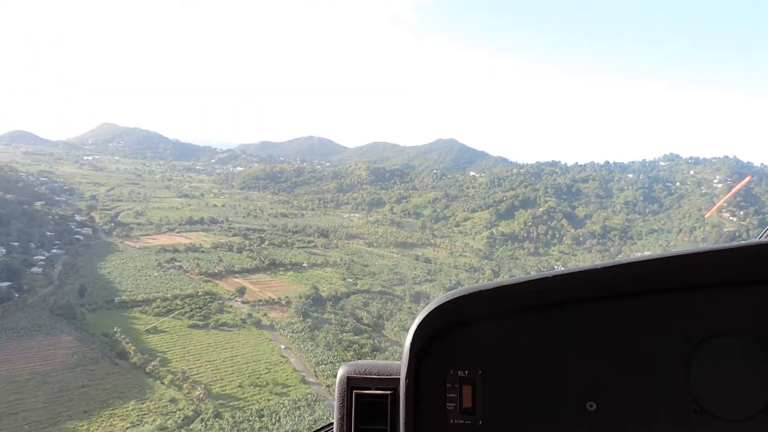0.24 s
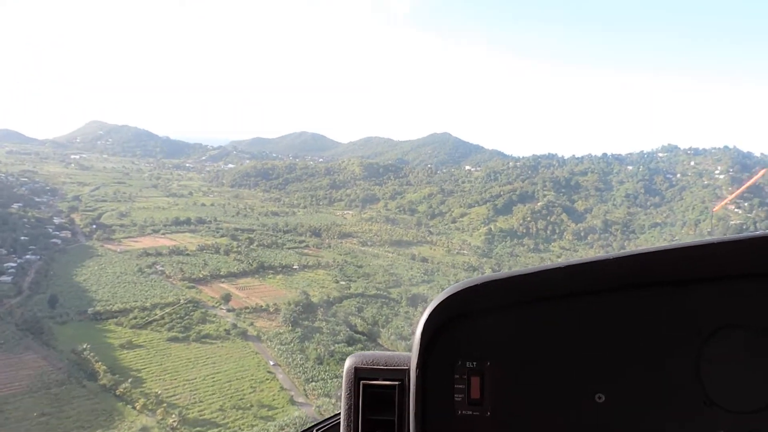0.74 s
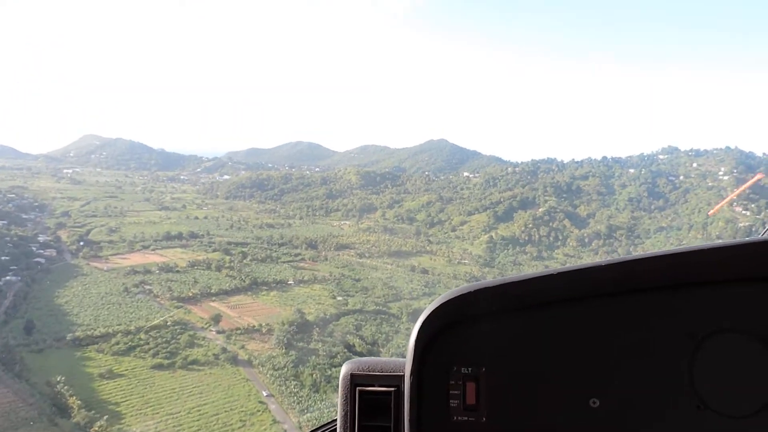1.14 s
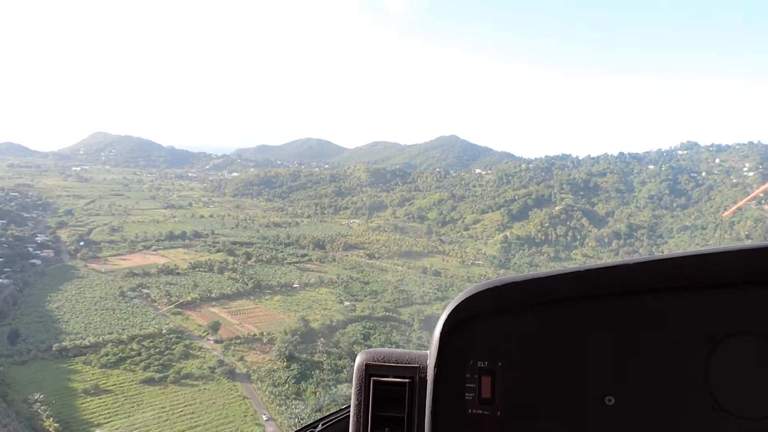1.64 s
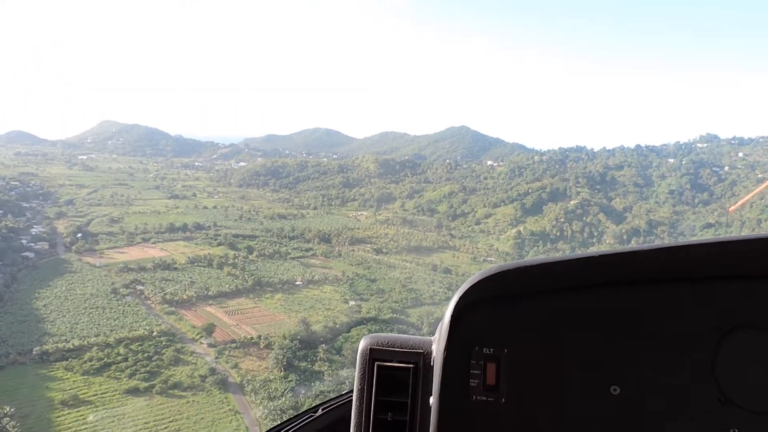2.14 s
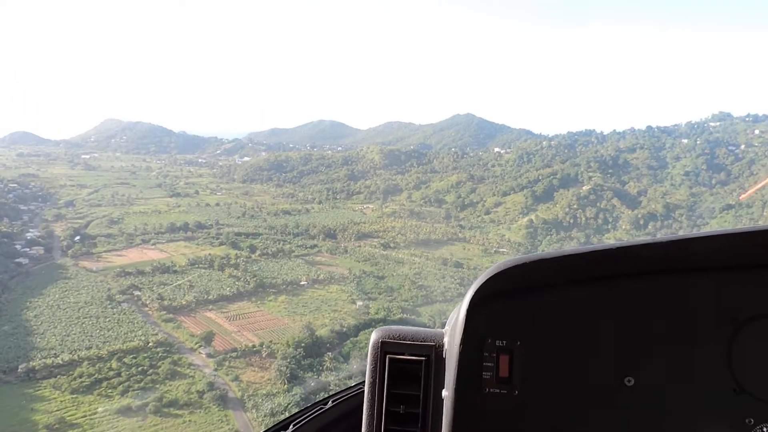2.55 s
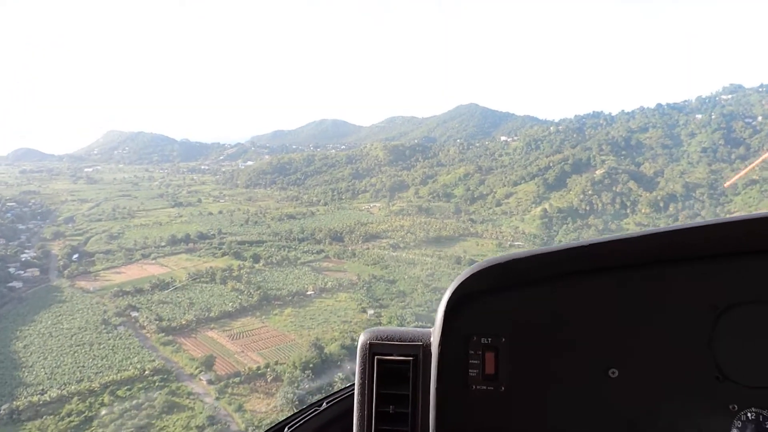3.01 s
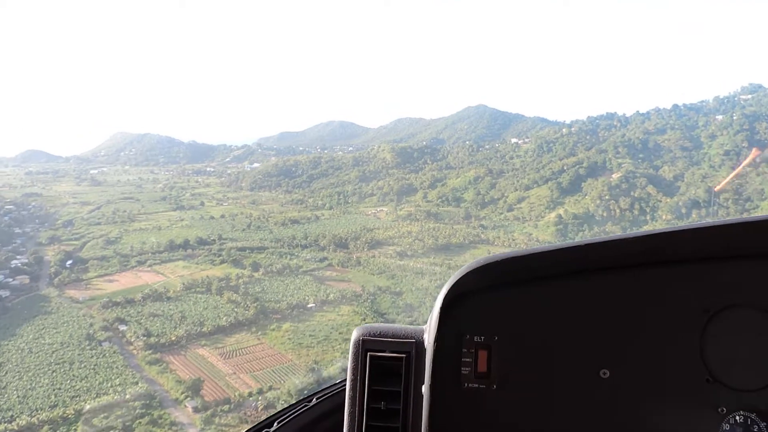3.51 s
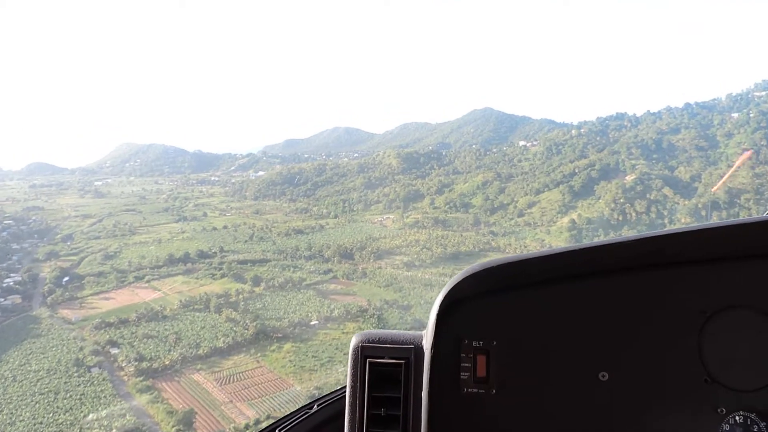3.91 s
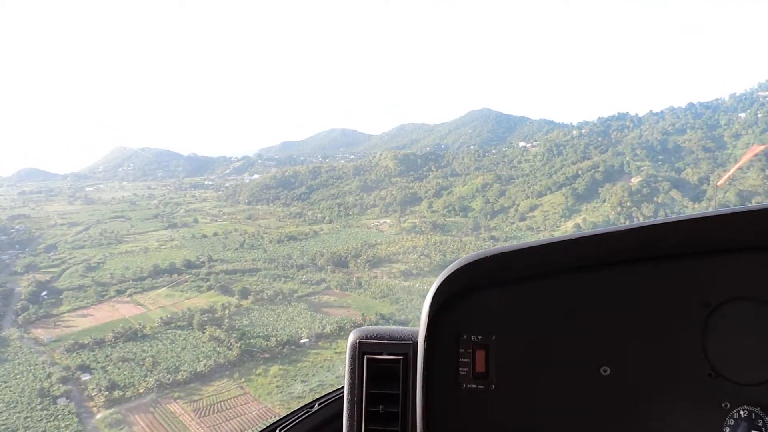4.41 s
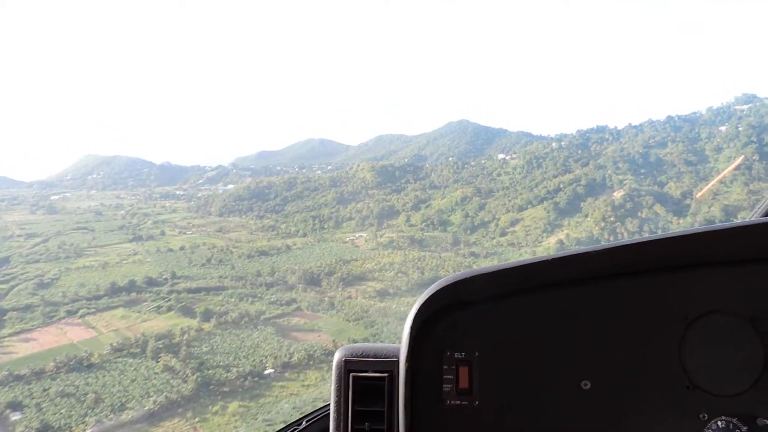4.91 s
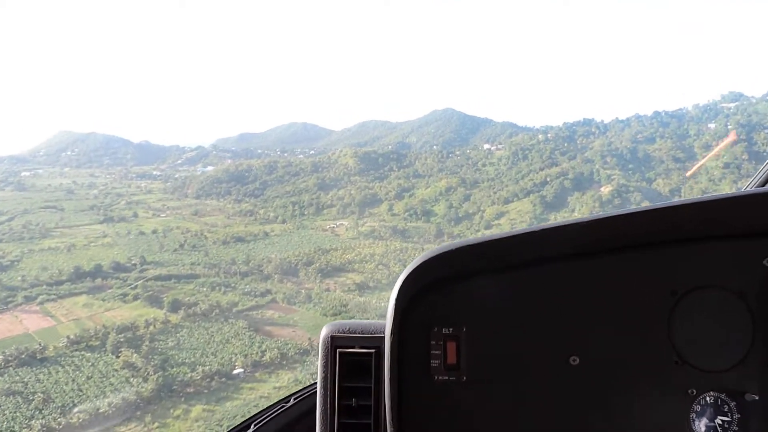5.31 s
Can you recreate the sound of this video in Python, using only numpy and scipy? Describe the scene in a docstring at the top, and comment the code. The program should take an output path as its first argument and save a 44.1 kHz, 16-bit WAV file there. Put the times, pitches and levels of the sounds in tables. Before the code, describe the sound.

Heard from inside a small helicopter cruising over green hills: a continuous low roar pulses about twenty times a second with the rotor blades. A tail rotor drone and shaft hum sit beneath broad air rush over the canopy, while steady gear whines ride on top. A soft breathy door-gap whistle swells briefly near the middle. The microphone is close, within the cabin, with bass nearly centred and airy highs wide.

```python
"""Inside the cabin of a light turbine helicopter in level flight.
The main rotor beats, the tail rotor drones and the gears whine: harmonic series locked to one rotor clock.
Turbulent air, as filtered noise, rumbles, booms in the cabin and rushes over the canopy;
each blade modulates the boom, rush and hiss. The compressor whistles faintly and a door gap breathes softly."""
import sys
import numpy as np
from scipy.fft import rfft, irfft
from scipy.io import wavfile
from scipy.ndimage import uniform_filter1d

SR = 44100
rng = np.random.default_rng(int(sys.argv[2]) if len(sys.argv) > 2 else 0)


def int16_out(signal):
    """Quantize to a 16-bit WAV file."""
    q = np.round(np.clip(np.atleast_2d(signal).T, -1, 1) * 32767)
    wavfile.write(sys.argv[1], SR, q.astype(np.int16))


N = 245195
TIME = np.arange(N) / SR  # seconds
FREQS = np.maximum(np.arange(N // 2 + 1) * SR / N, 1)  # Hz, kept above zero for the logarithm
LEFT_RIGHT = np.array([[1], [-1]])
BLADE_HZ = 19.7  # passing rate of the main rotor blades


def from_db(db):
    """Logarithmic level: decibels to amplitude gain."""
    return 10 ** (np.asarray(db) / 20)


def rms_one(x):
    """Normalisation: scale to unit rms."""
    return x / np.sqrt(np.mean(x ** 2) + 1e-20)


def in_time(rows):
    """Linear interpolation: a level curve read at every sample."""
    seconds, level_db = np.transpose(rows)
    return np.interp(TIME, seconds, level_db)


def over_hz(points):
    """Logarithmic pitch axis: a spectral table read at every frequency."""
    hz, value = np.transpose(points)
    return np.interp(np.log(FREQS), np.log(hz), value)


def bell(hz, width_hz):
    """Resonance: a Lorentzian curve with a peak of 1."""
    return 1 / (1 + (2 * (FREQS - hz) / width_hz) ** 2)


def drift(rate_hz):
    """Random fluctuation: low-passed noise of unit rms."""
    lowpass = 1 / (1 + (FREQS / rate_hz) ** 2) ** 2
    return rms_one(irfft(rfft(rng.standard_normal(N)) * lowpass, N))


def swells(rows):
    """Superposition of Gaussian swells in dB; each length is the width at half height."""
    return sum(db * 0.5 ** ((2 * (TIME - centre_s) / length_s) ** 2) for centre_s, length_s, db in rows)


def steadied(x, seconds):
    """Level compression: divide noise by its running rms."""
    power = uniform_filter1d(x.mean(axis=0) ** 2, int(seconds * SR))
    return x / np.sqrt(power)


def band_lifted(x, hz, width_hz, lift_db):
    """Time-varying resonance: raise one band by a changing amount."""
    return x + irfft(rfft(x) * bell(hz, width_hz), N) * (from_db(lift_db) - 1)


def buffeted(x, gusts, width_hz):
    """Superposed local resonances: every gust lifts or drops one band."""
    spectrum = rfft(x)
    out = x.copy()
    for centre_s, length_s, change_db, centre_hz in gusts:
        band = irfft(spectrum * bell(centre_hz, width_hz), N)
        out += band * (from_db(swells([(centre_s, length_s, change_db)])) - 1)
    return out


def partials(clock, hz, table, scatter, scatter_rate_hz):
    """Harmonic series of a rotating part; multipath scatter makes each partial waver."""
    out = np.zeros((2, N))
    for multiple, level_db, pan_db, lead_rad in table:
        phase = 2 * np.pi * (multiple * hz * clock + rng.random()) + LEFT_RIGHT * lead_rad / 2
        in_phase = (1 + scatter * drift(scatter_rate_hz)) * np.cos(phase)
        quadrature = scatter * drift(scatter_rate_hz) * np.sin(phase)
        out += from_db(level_db + LEFT_RIGHT * pan_db / 2) * rms_one(in_phase + quadrature)
    return out


# stereo width of the air noise: frequency_hz, side_minus_mid_db
FIELD_WIDTH = [(40, -29), (130, -32), (250, -15), (340, -20), (480, -9.5), (660, -15), (1000, -8),
               (1230, -4), (1500, -8), (1820, 1), (2100, -3.5), (2700, 3), (3500, 3), (5500, -1.5)]
# stereo balance of the air noise: frequency_hz, left_minus_right_db
FIELD_BALANCE = [(60, 0), (360, 1.5), (660, 1.5), (1200, 1.5), (2400, -1), (4000, 1.2), (7200, 2),
                 (13000, 4)]
# quarter-turn phase share between mid and side, by frequency; positive where the left channel leads:
# frequency_hz, share (-1 to 1)
FIELD_LEAD = [(130, .2), (260, -.2), (700, -.1), (1120, .35), (1720, -.2), (2000, .35), (2450, -.25),
              (3000, -.25), (4800, -.05), (6500, .12), (9000, 0)]


def air_noise(gain):
    """Spatial coherence: coloured noise whose two channels agree by frequency; mid rms 1."""
    mid, side = rfft(rng.standard_normal((2, N)))
    width = from_db(over_hz(FIELD_WIDTH))
    lead = np.clip(over_hz(FIELD_LEAD), -1, 1)
    # a quarter-turn of phase between mid and side makes one channel lead
    side = np.sqrt(1 - lead ** 2) * side + 1j * lead * mid
    field = (mid + LEFT_RIGHT * width * side) / np.sqrt(1 + width ** 2)
    balance = from_db(LEFT_RIGHT * over_hz(FIELD_BALANCE) / 2)
    out = irfft(field * gain * balance, N)
    return out / np.std(out.mean(axis=0))


# airflow shared by boom, rush and hiss; it peaks early, then eases off: time_s, level_db
AIRFLOW_LEVEL = [(0, 0.3), (1.0, 0.5), (2.8, 0.05), (5.56, -0.95)]


def airflow_db():
    """Flow noise grows with airflow: the slow level common to boom, rush and hiss."""
    return in_time(AIRFLOW_LEVEL)


# swish of each passing blade, before each layer scales it: multiple of the blade rate, depth (0 to 1)
SWISH_HARMONICS = [(1, .05), (2, .025), (3, .015)]


def swish(clock):
    """Amplitude modulation: swing of the air noise around its mean as the blades pass."""
    turn = 2 * np.pi * BLADE_HZ * clock
    return sum(depth * np.cos(multiple * turn) for multiple, depth in SWISH_HARMONICS)


# relative spectrum of the deep hull rumble: frequency_hz, density_db (per Hz)
RUMBLE_SPECTRUM = [(10, -30), (24, -32), (34, 3), (55, 1), (72, 3.5), (100, -8.5), (200, -46), (1000, -100)]


def hull_rumble():
    """Turbulent boundary-layer excitation: deep noise from the hull."""
    return from_db(-31.5) * steadied(air_noise(from_db(over_hz(RUMBLE_SPECTRUM))), seconds=0.25)


# resonances of the door gap: frequency_hz, width_hz, level_db (relative)
DOOR_GAP_MODES = [(2660, 380, -4), (2940, 160, -2)]
# swells of the door whistle: centre_s, length_s, rise_db
DOOR_GAP_SWELLS = [(2.42, 0.3, 4), (2.66, 0.24, 9.5), (2.99, 0.24, 7.5)]
DOOR_GAP_DB = -57  # between swells


def door_leak():
    """Resonant filtering: air noise through a narrow gap makes a soft, breathy, swelling whistle."""
    colour = sum(from_db(db) * bell(hz, width_hz) for hz, width_hz, db in DOOR_GAP_MODES)
    return from_db(DOOR_GAP_DB + swells(DOOR_GAP_SWELLS)) * air_noise(colour)


# relative spectra of canopy rush and seal hiss: frequency_hz, density_db (per Hz)
RUSH_SPECTRUM = [(20, -38), (150, -19), (240, -1), (340, -1), (420, -1.5), (480, -5.5), (610, -4),
                 (1050, -9.5), (1200, -10), (1800, -11), (2150, -15), (2700, -16.5), (3250, -21),
                 (3900, -26.5), (9000, -70)]
HISS_SPECTRUM = [(1000, -40), (2500, -17), (4400, 3.5), (4950, 0.5), (5600, 1), (7000, -4.5), (8800, -7),
                 (10200, -7), (11800, -7.5), (13400, -8)]
# cabin and panel resonances: frequency_hz, width_hz, gain_db
PANEL_MODES = [(241, 16, 3.5), (320, 15, 4), (380, 15, 1), (443, 13, 0.5), (580, 17, 1.5), (747, 75, 1.5),
               (928, 42, 2.5), (1056, 89, 3), (1947, 63, 2.5), (2150, 58, 2.5), (2460, 160, 2.5),
               (3300, 23, 2.5), (3460, 120, 2.5), (4100, 90, 3)]
# slow hollowing and filling of the rush's low middle: centre_s, length_s, change_db, centre_hz
RUSH_BAND_SWELLS = [(1.6, 1.0, -1.5, 378), (2.85, 0.91, 2.5, 427), (3.9, 0.7, 2, 320), (5.4, 0.45, 3, 313)]
RUSH_DB, HISS_DB = -29, -51.5  # before the airflow changes
CHOP_HZ, CHOP_WIDTH_HZ = 480, 700  # band that the blades chop hardest
CHOP_DB, CHOP_UNEVEN_DB = 0.55, 0.5  # swing with the blades, random swing
ROAR_HZ, ROAR_WIDTH_HZ, ROAR_FOLLOWS = 2300, 990, 0.8  # faster air brightens this band: dB per dB
HISS_SWISH = 0.82  # share of the blade swish


def canopy_air(clock):
    """Modulated flow noise: rush over the canopy and seal hiss swell with each blade's downwash."""
    blade = swish(clock)
    speed_db = airflow_db()
    flow_db = speed_db + 0.4 * drift(32)
    modes_db = sum(db * bell(hz, width_hz) for hz, width_hz, db in PANEL_MODES)
    rush = steadied(air_noise(from_db(over_hz(RUSH_SPECTRUM) + modes_db)), seconds=0.24)
    rush = buffeted(rush, RUSH_BAND_SWELLS, width_hz=67)
    chop_db = CHOP_DB * np.cos(2 * np.pi * BLADE_HZ * clock) + CHOP_UNEVEN_DB * drift(29)
    rush = band_lifted(rush, CHOP_HZ, CHOP_WIDTH_HZ, chop_db)
    rush = band_lifted(rush, ROAR_HZ, ROAR_WIDTH_HZ, ROAR_FOLLOWS * speed_db)
    rush = from_db(RUSH_DB + flow_db) * rush
    hiss = from_db(HISS_DB + flow_db) * air_noise(from_db(over_hz(HISS_SPECTRUM)))
    return rush * (1 + blade) + hiss * (1 + HISS_SWISH * blade)


# compressor tone: multiple, level_db (before its level curve), left_minus_right_db, left_lead_rad
COMPRESSOR_TONE = [(1, -72, 3, 1)]
# coming and going of that tone: time_s, level_db (relative)
COMPRESSOR_LEVEL = [(0, -8), (2.3, -7), (2.6, 0), (3.4, 1.5), (3.8, -3), (4.6, 0.5), (5.15, 3), (5.56, -4)]
WHISTLE_HZ = 10831
SKIRT_HZ, SKIRT_WIDTH_HZ, SKIRT_DB = 10815, 390, -70  # hiss around the whistle


def compressor(clock):
    """Tone in narrow-band noise: a thin whistle comes and goes on fluttering turbulent hiss."""
    tone = partials(clock, WHISTLE_HZ, COMPRESSOR_TONE, scatter=0.7, scatter_rate_hz=30)
    whistle = from_db(in_time(COMPRESSOR_LEVEL)) * tone
    skirt = steadied(air_noise(bell(SKIRT_HZ, SKIRT_WIDTH_HZ)), seconds=0.12)
    return whistle + from_db(SKIRT_DB + 2.5 * drift(22)) * skirt


# gear partials: multiple, level_db (before any trim below), left_minus_right_db, left_lead_rad
MAIN_MESH = [(1, -43, -3, 0), (2, -45, -1.5, 1.4), (3, -52.5, 10.5, 2), (4, -55.5, 4, 4.5), (5, -63, 4, -1),
             (6, -71, -12, 1)]
BEVEL_MESH = [(1, -46, 1.7, -1.5)]
ENGINE_MESH = [(1, -52, -1.3, -1)]
MESH_HZ, BEVEL_HZ, ENGINE_GEAR_HZ = 656.52, 1750.6, 1735.0
MAIN_TRIM_DB, BEVEL_TRIM_DB = -0.06, 1.5


def gearbox(clock):
    """Gear meshing: tooth contacts whine at their mesh rates through the cabin roof."""
    main = partials(clock, MESH_HZ, MAIN_MESH, scatter=0.028, scatter_rate_hz=6.8)
    bevel = partials(clock, BEVEL_HZ, BEVEL_MESH, scatter=0.075, scatter_rate_hz=15)
    engine = partials(clock, ENGINE_GEAR_HZ, ENGINE_MESH, scatter=0.33, scatter_rate_hz=4.0)
    return from_db(MAIN_TRIM_DB) * main + from_db(BEVEL_TRIM_DB) * bevel + engine


# tail rotor and drive shaft partials: multiple, level_db, left_minus_right_db, left_lead_rad
TAIL_PARTIALS = [(1, -31, 2.8, 0.019), (2, -27, 1, 0.078), (3, -44.5, 6, -.2), (4, -53, 2.3, -.1)]
SHAFT_PARTIALS = [(1, -34, 2.1, .15)]
TAIL_HZ, SHAFT_HZ = 69.62, 102.3


def tail_drone(clock):
    """Rotational noise: tail rotor harmonics and the hum of the drive shaft."""
    tail = partials(clock, TAIL_HZ, TAIL_PARTIALS, scatter=0.083, scatter_rate_hz=3.7)
    shaft = partials(clock, SHAFT_HZ, SHAFT_PARTIALS, scatter=0.16, scatter_rate_hz=2.7)
    return tail + shaft


# relative spectrum of the cabin boom: frequency_hz, density_db (per Hz)
BOOM_SPECTRUM = [(20, -46), (65, -18), (82, -11), (94, -0.5), (118, 3), (150, -0.5), (198, -6), (222, -14),
                 (400, -54), (1000, -100)]
BOOM_DB = -25  # before the airflow changes
BOOM_SWISH, BOOM_LAG_S = 1.5, 0.015  # multiple of the blade swish, and its delay


def cabin_boom(clock):
    """Delayed amplitude modulation: a low roar pumps just after each blade."""
    boom = steadied(air_noise(from_db(over_hz(BOOM_SPECTRUM))), seconds=0.07)
    pumping = 1 + BOOM_SWISH * swish(clock - BOOM_LAG_S)
    return from_db(BOOM_DB + airflow_db()) * boom * pumping


# gusts and lulls in the low drone: centre_s, length_s, change_db, centre_hz
DRONE_GUSTS = [(0.04, 0.16, 4, 121), (0.144, 0.04, -6, 145), (0.493, 0.13, 5.5, 165), (0.78, 0.17, 5, 154),
               (1.26, 0.12, 1, 171), (1.46, 0.054, -7, 135), (1.565, 0.07, 6.5, 149), (1.70, 0.035, 9, 110),
               (2.11, 0.084, 6, 120), (2.233, 0.053, -9, 126), (2.327, 0.07, 8.5, 131),
               (2.60, 0.23, 2.5, 170), (2.877, 0.07, -5, 140), (3.48, 0.21, 3.2, 135),
               (3.69, 0.088, 0, 110), (3.985, 0.13, 1, 188), (4.175, 0.14, 2.5, 115),
               (4.367, 0.07, -7, 131), (4.517, 0.21, -4, 173), (4.897, 0.2, 5.5, 101),
               (5.035, 0.076, 5.5, 140), (5.49, 0.084, 3.5, 120)]


def low_drone(clock):
    """Band-wise gust modulation: tail drone and cabin boom swell or thin together."""
    return buffeted(tail_drone(clock) + cabin_boom(clock), DRONE_GUSTS, width_hz=43)


# harmonics of the blade pressure pulse: multiple of the blade rate, level_db (mean rms level)
PULSE_HARMONICS = [(2, -28), (3, -35), (4, -41)]
BEAT_UNEVEN_DB, HEAVE_DB = 0.6, -29.3


def blade_beats(clock):
    """Fourier synthesis: one rounded pressure pulse per blade, while the hull heaves the opposite way."""
    turn = 2 * np.pi * BLADE_HZ * clock
    pulse = sum(from_db(db) * np.cos(multiple * turn) for multiple, db in PULSE_HARMONICS)
    pulse = pulse * from_db(BEAT_UNEVEN_DB * drift(9.9))
    heave = from_db(HEAVE_DB) * np.cos(turn)
    return np.sqrt(2) * (pulse - heave)  # rms levels to peaks


FIRST_BLADE_S = 0.0198  # near this time the clock passes zero


def scene():
    """Phase locking: all rotating parts share one clock and its slight wander."""
    clock = np.cumsum(1 + 0.00055 * drift(0.97)) / SR - FIRST_BLADE_S
    air = hull_rumble() + door_leak() + canopy_air(clock)
    whines = compressor(clock) + gearbox(clock)
    return air + whines + low_drone(clock) + blade_beats(clock)


CUTOFF_HZ = 13480


def record(dry):
    """Low-pass filtering: the top is cut steeply."""
    return irfft(rfft(dry) / np.sqrt(1 + (FREQS / CUTOFF_HZ) ** 900), N)


dry = scene()
out = record(dry)
int16_out(out)
```